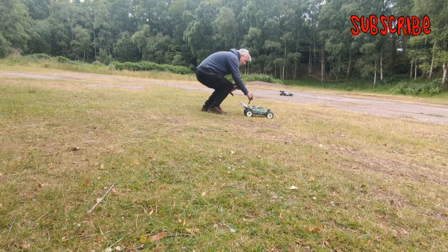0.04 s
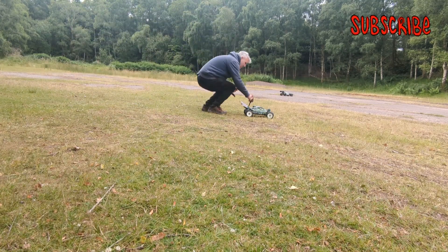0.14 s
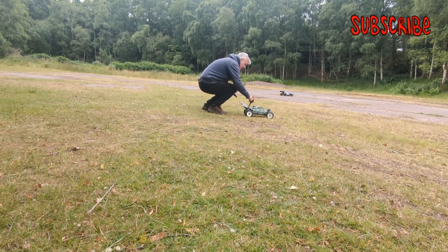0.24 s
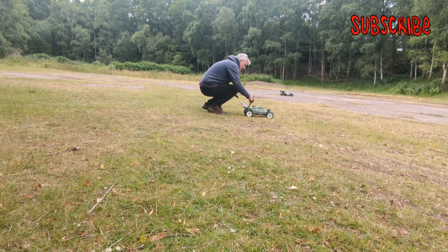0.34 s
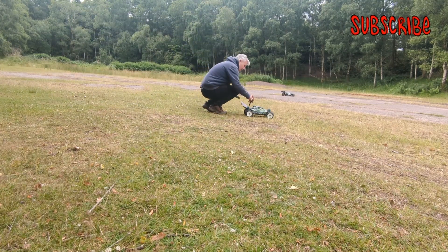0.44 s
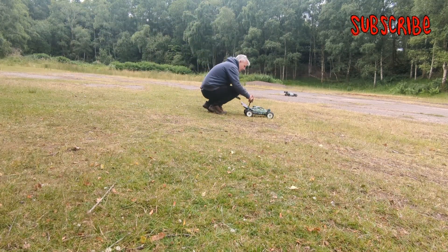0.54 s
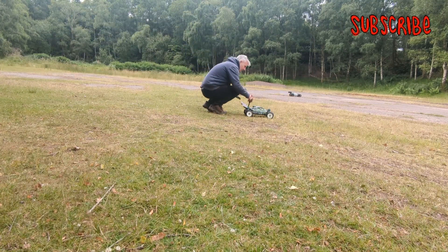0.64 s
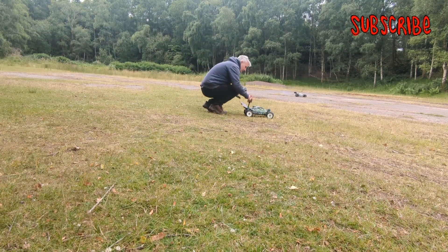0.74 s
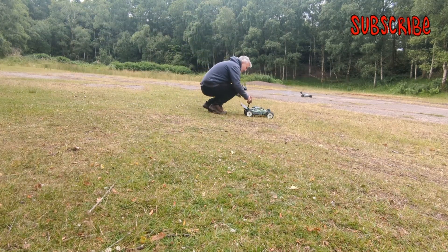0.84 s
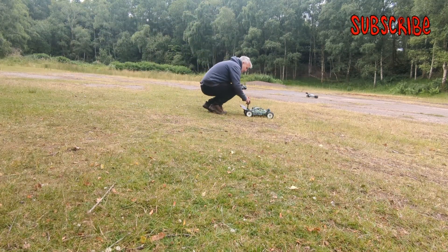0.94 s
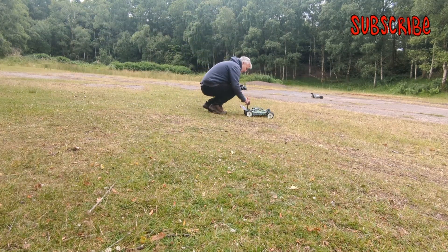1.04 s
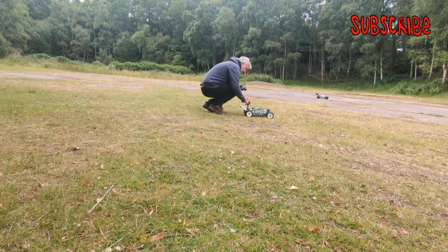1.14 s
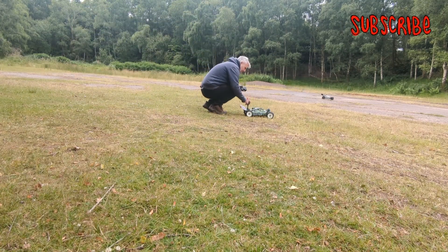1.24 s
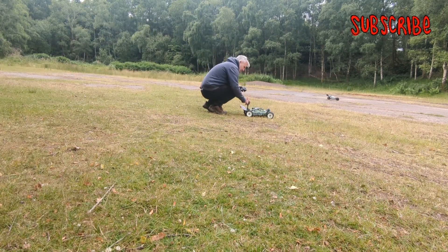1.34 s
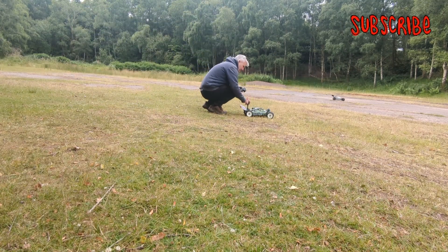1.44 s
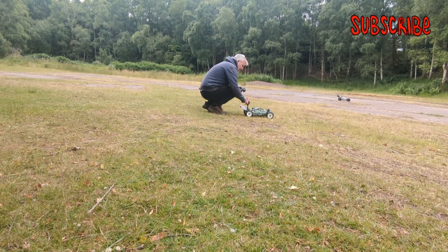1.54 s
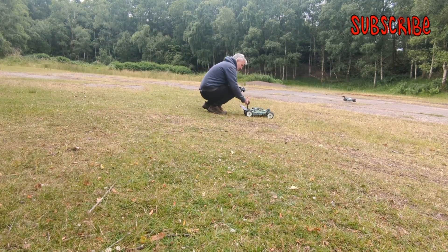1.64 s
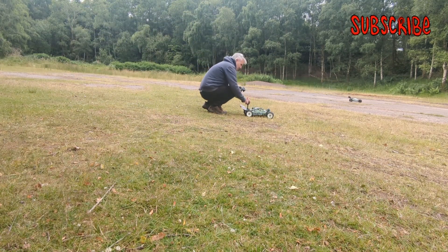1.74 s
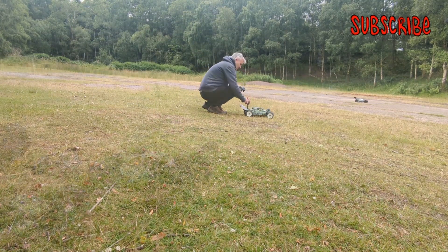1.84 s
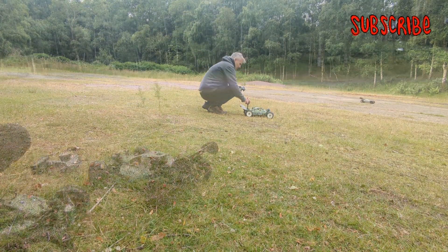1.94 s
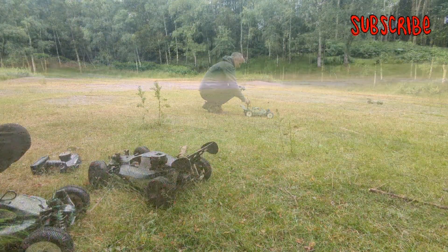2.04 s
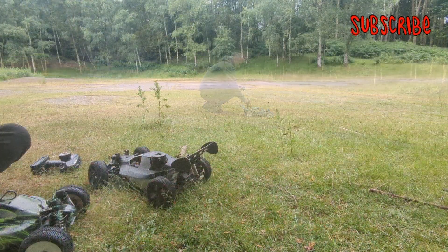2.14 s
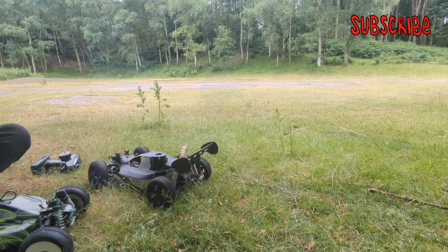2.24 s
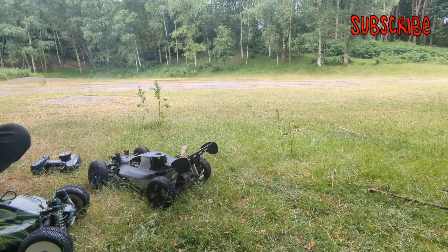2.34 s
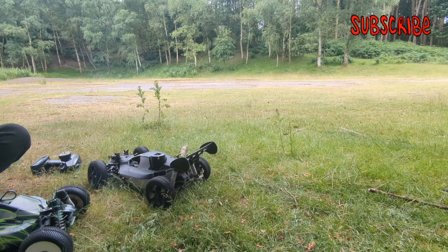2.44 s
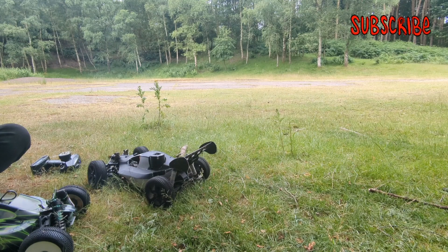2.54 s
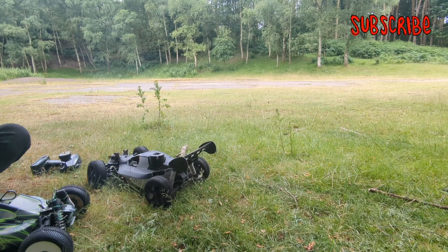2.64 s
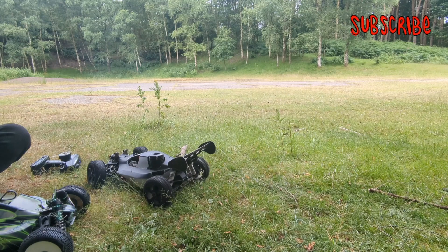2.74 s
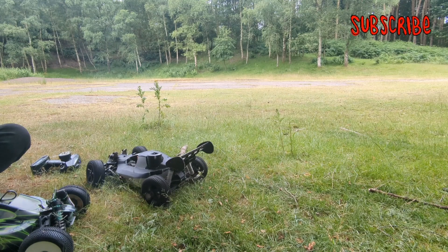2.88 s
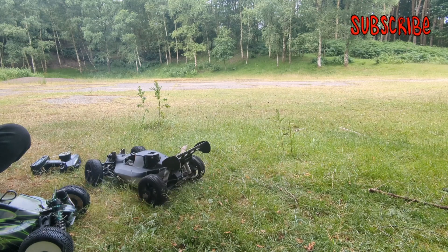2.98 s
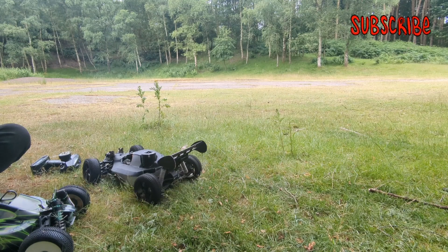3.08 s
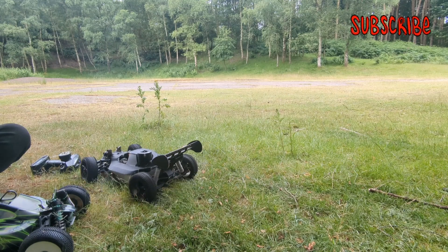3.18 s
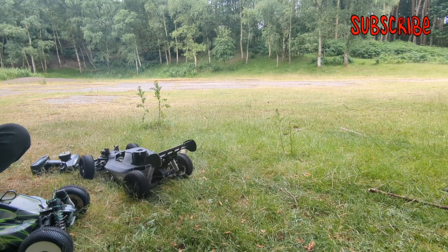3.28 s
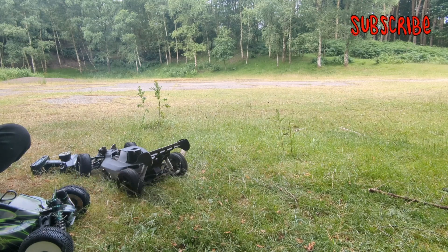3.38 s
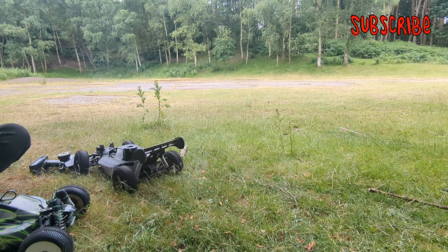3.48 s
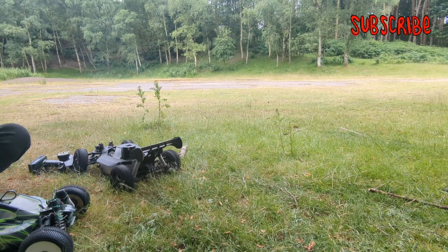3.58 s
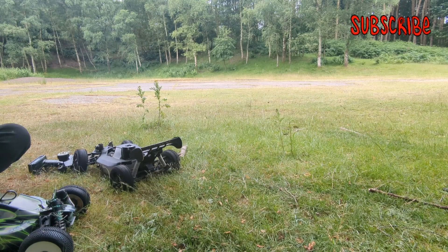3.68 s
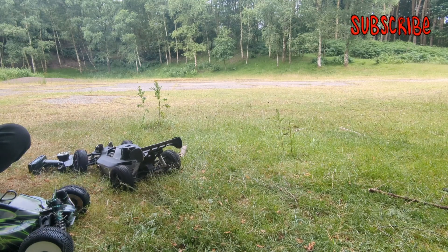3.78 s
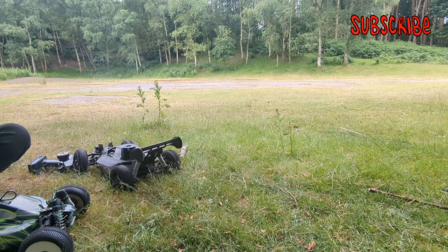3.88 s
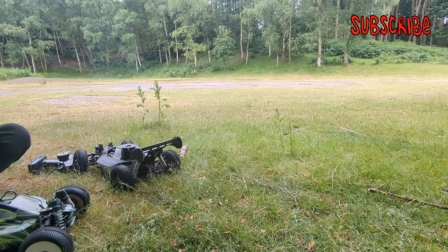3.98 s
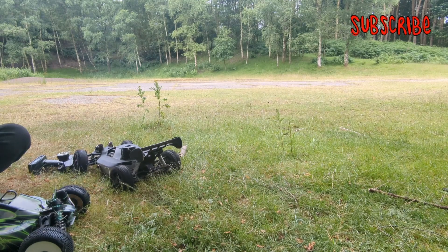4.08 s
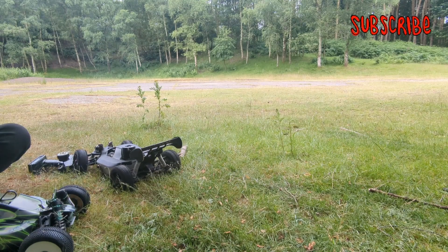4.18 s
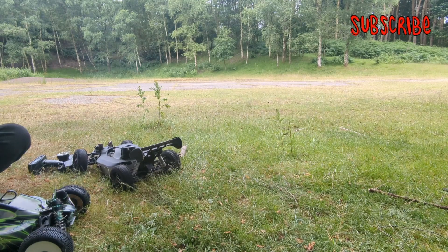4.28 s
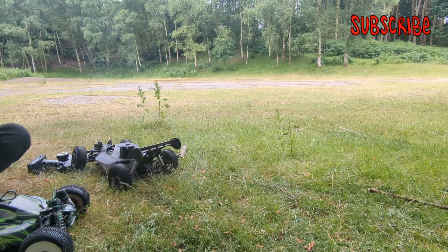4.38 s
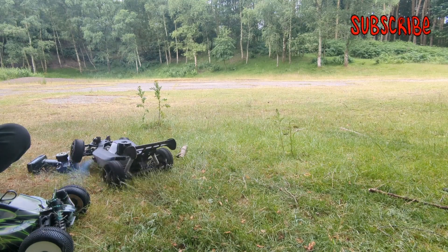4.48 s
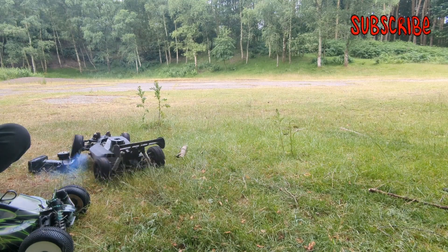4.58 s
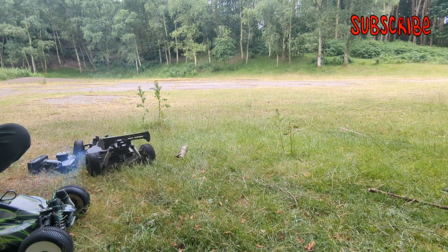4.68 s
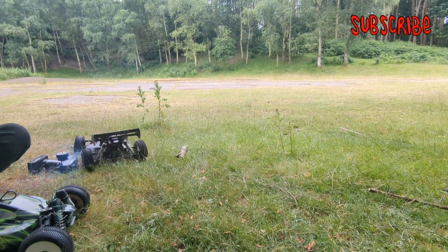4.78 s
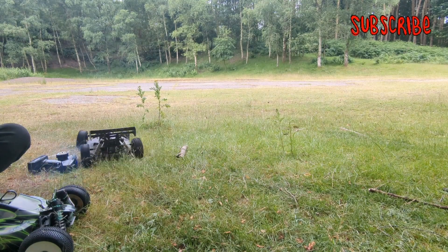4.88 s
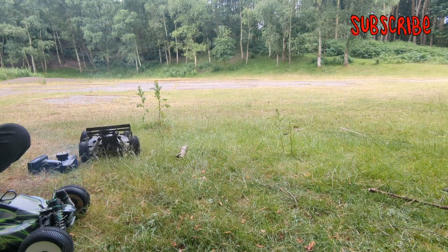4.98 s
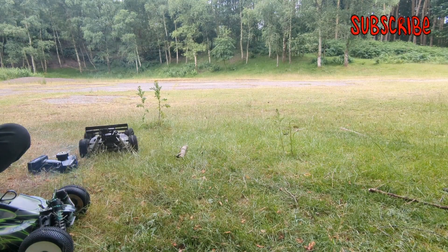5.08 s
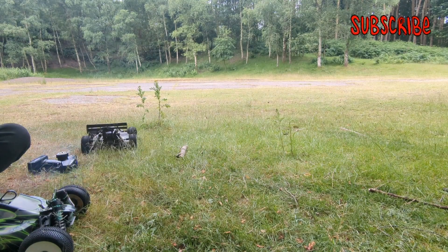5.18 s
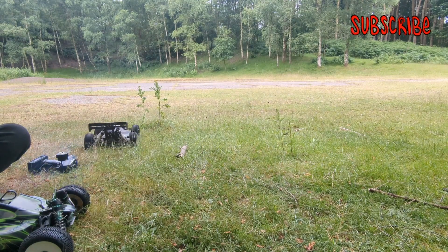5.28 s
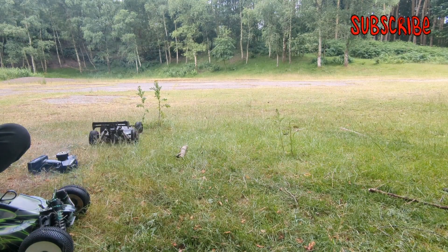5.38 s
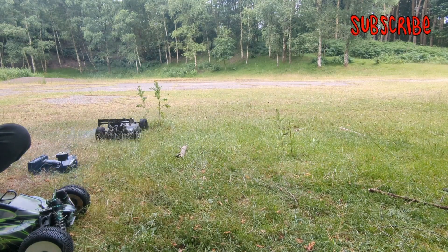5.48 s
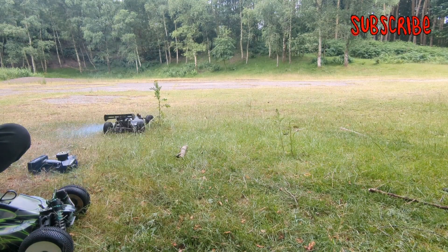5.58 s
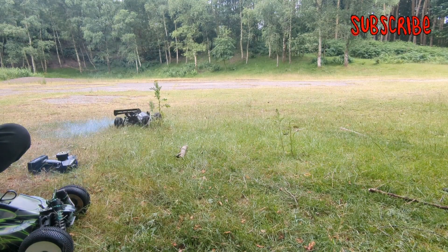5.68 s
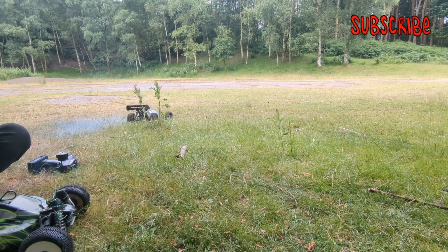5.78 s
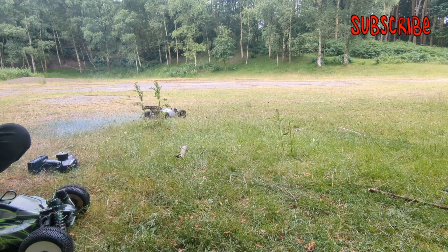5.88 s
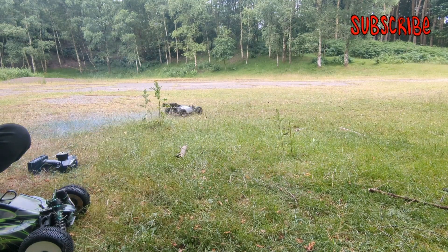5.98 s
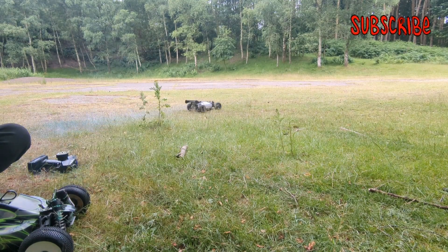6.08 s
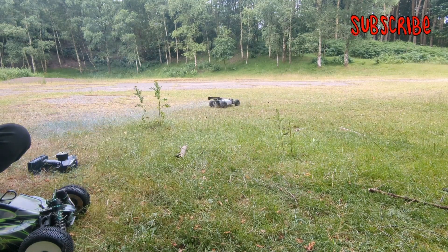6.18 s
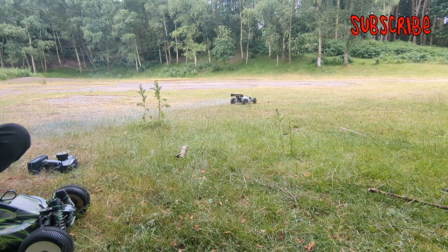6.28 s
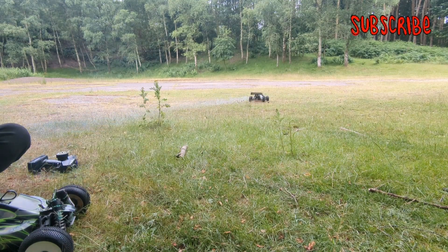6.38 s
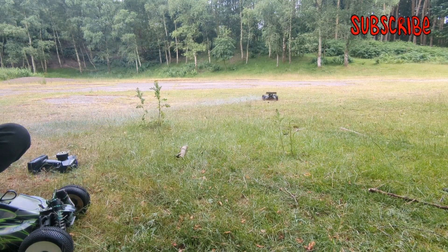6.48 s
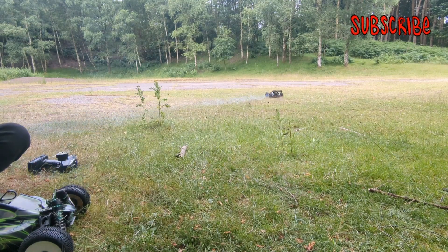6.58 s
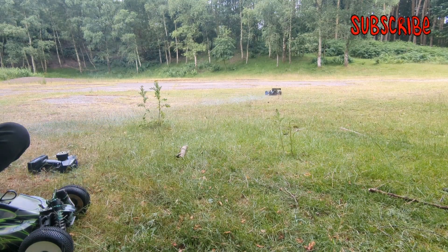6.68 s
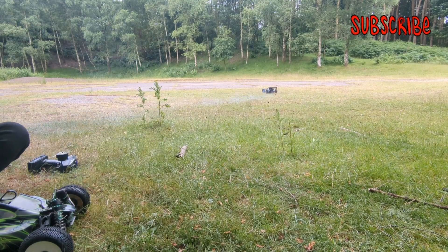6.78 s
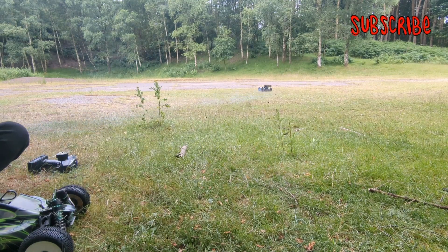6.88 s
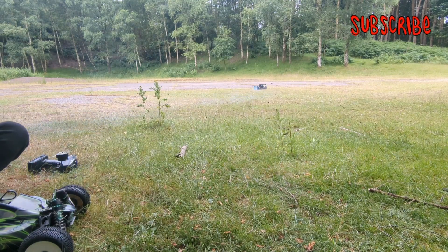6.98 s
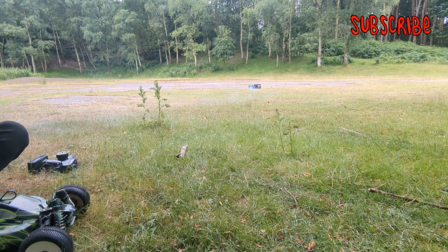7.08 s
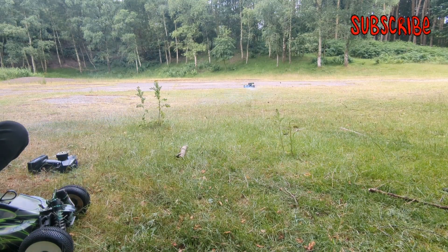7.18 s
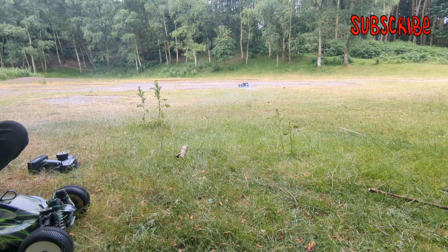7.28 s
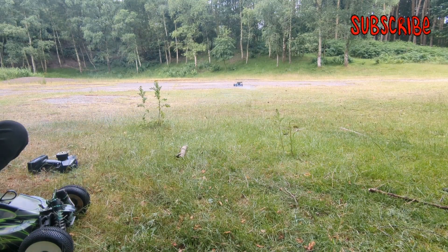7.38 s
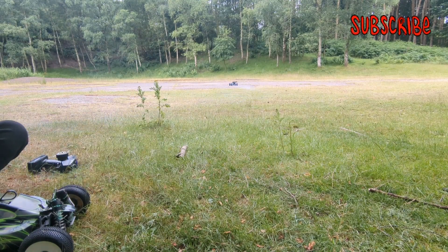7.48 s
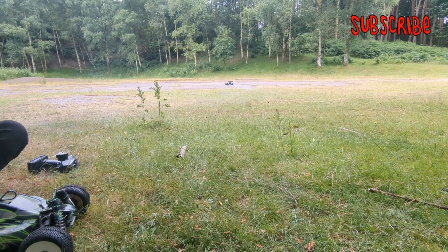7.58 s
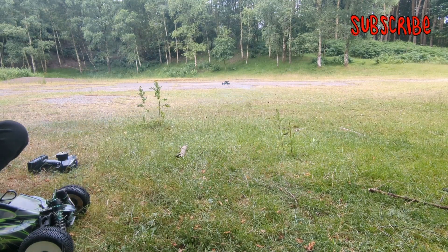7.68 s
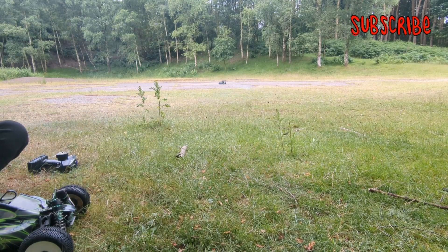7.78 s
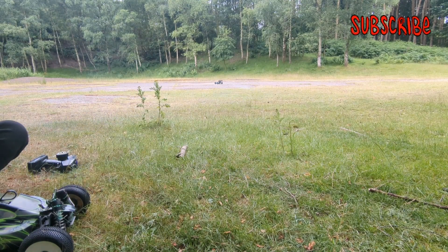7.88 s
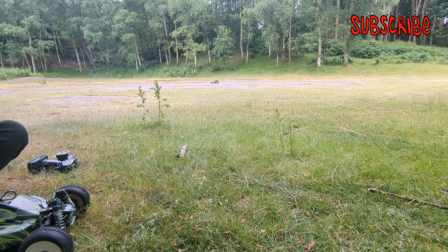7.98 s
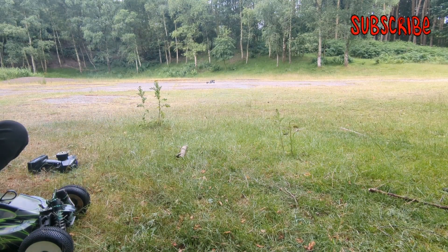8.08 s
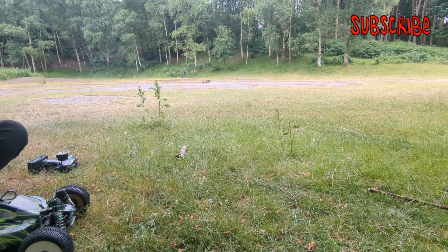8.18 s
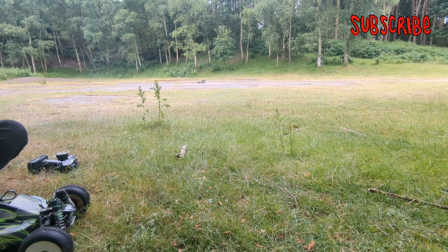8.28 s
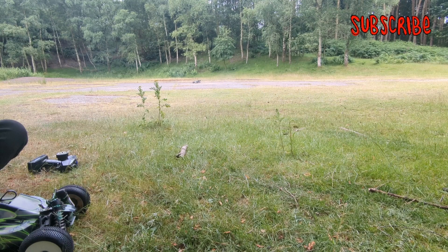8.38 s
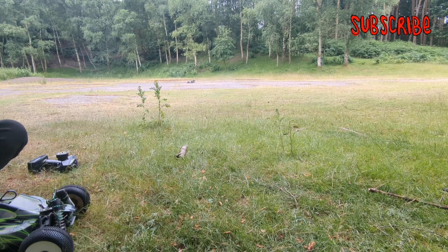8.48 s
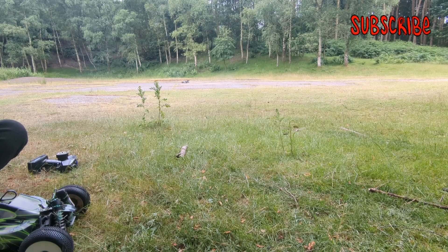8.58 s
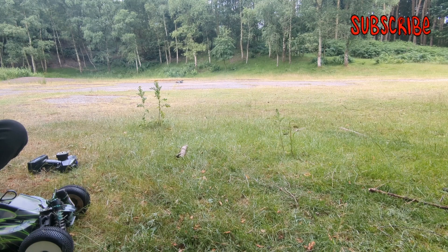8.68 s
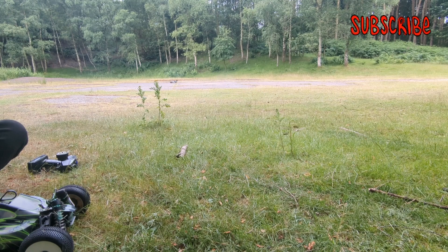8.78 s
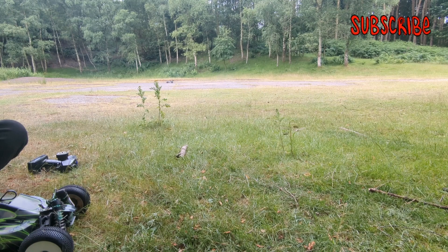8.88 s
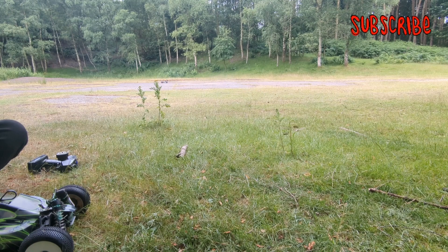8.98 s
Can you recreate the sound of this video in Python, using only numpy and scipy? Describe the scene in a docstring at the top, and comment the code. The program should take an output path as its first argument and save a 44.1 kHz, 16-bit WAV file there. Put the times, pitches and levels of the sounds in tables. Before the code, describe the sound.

Outdoors on a field by a wood, a distant model buggy engine stutters and revs briefly. Another small two-stroke takes over close to the microphone on the left, sputtering at first, then running steadily with a bright, ringing rasp. It revs up and down as it pulls away, growing fainter and dropping back to a burble. Soft wind rumble and a faint hush lie underneath, with a single hard tap just before the end.

```python
"""A small two-stroke model buggy burbles and revs some way off, on a field by a wood. As it fades, a second
sputters in close to the microphone on the left, runs steadily, then drives off blipping its throttle.
Each firing sounds the tuned exhaust pipe and rings the crankcase and fins; at part throttle the engines
fire in short runs with misfires between. The trees return a faint echo, light wind rumbles on the
microphone, and there is one close knock near the end."""
import sys
import numpy as np
from scipy import signal
from scipy.fft import rfft, irfft, next_fast_len
from scipy.io import wavfile
from scipy.ndimage import uniform_filter1d, map_coordinates

SR = 44100
rng = np.random.default_rng(int(sys.argv[2]) if len(sys.argv) > 2 else 0)


def int16_out(signal):
    """Quantize to a 16-bit WAV file."""
    q = np.round(np.clip(np.atleast_2d(signal).T, -1, 1) * 32767)
    wavfile.write(sys.argv[1], SR, q.astype(np.int16))


N = 398223


def gain_of(db):
    return 10 ** (np.asarray(db) / 20)


def unit_rms(x):
    return x / np.sqrt(np.mean(x ** 2) + 1e-20)


def level_at(spectrum, hz):
    freqs, db = np.transpose(spectrum)
    return np.interp(np.log(hz + 1), np.log(freqs + 1), db)


def curves(rows):
    """One curve for each column after the time."""
    times, *columns = np.transpose(rows)
    return [np.interp(np.arange(N) / SR, times, column) for column in columns]


def impulses(events, height):
    out = np.zeros(N)
    for at_s, value in events:
        out[round(at_s * SR)] = height(value)
    return out


def drift(seconds):
    """Smooth random wander of rms 1."""
    span = max(round(seconds * SR), 1)
    return unit_rms(uniform_filter1d(uniform_filter1d(rng.standard_normal(N), span), span))


def stereo_noise(spectrum):
    size = next_fast_len(N)
    shape = gain_of(level_at(spectrum, np.fft.rfftfreq(size, 1 / SR)))
    return unit_rms(irfft(rfft(rng.standard_normal((2, size))) * shape, size)[:, :N])


def ring(x, modes, widen=0.85, drift_db=0.):
    """Steep resonances, alternating in sign; each level may drift."""
    out = 0
    for k, (hz, width, db) in enumerate(modes):
        pole = np.exp((2j * np.pi * hz - np.pi * width * widen) / SR)
        once = signal.lfilter([1 - abs(pole)], [1, -pole], x)
        twice = signal.lfilter([1 - abs(pole)], [1, -pole], once).real
        out = out + (-1) ** k * gain_of(db + np.roll(drift_db, k * SR)) * twice
    return unit_rms(out)


def gliding_ring(x, hz, width):
    """A steep resonance that follows the curve hz: shift down, smooth twice, shift back."""
    carrier = np.exp(2j * np.pi * np.cumsum(hz) / SR)
    r = np.exp(-np.pi * width / SR)
    return unit_rms((carrier * signal.lfilter([(1 - r) ** 2], [1, -2 * r, r * r], x / carrier)).real)


def field_hush():
    """Distant air and leaves, steady all round."""
    # (frequency [Hz], density [dB])
    spectrum = [(100, -23), (200, -10.5), (400, -10), (1000, -17.5), (2300, -22.5), (5000, -51),
                (9000, -28), (16000, -55)]
    return gain_of(-56) * stereo_noise(spectrum)


def wind():
    """Lumpy rumble, with a few puffs on the microphone ports."""
    # rumble (frequency [Hz], density [dB])
    spectrum = [(30, -54), (60, -1.5), (100, -7), (170, -9), (240, -17), (400, -70)]
    # gusts and single puffs (time [s], level [dB])
    gusts = [(0.0, -69), (0.98, -72), (1.63, -57.5), (2.4, -72), (5.28, -66), (8.73, -85), (9.03, -71)]
    puff_hits = [(0.329, -57), (5.448, -49), (7.919, -59)]
    puffs = signal.oaconvolve(impulses(puff_hits, gain_of), np.hanning(round(0.078 * SR)), "same")
    lumps = gain_of(curves(gusts)[0] + 12 * np.tanh(0.45 * drift(0.069) + .5 * drift(0.035)))
    return stereo_noise(spectrum) * (lumps + 2.2 * puffs) * gain_of([[-1.5], [1.5]])


def wood_echo(x, t60=0.86, first_s=0.016):
    """Scattered returns from ground and trees: sparse taps of random sign, dying away."""
    count = SR // 40
    at = 20 * np.arange(count) + rng.integers(0, 20, (2, count))
    returns = rng.choice([-1., 1.], at.shape) * gain_of(-60 * at / SR / t60) * (at > first_s * SR)
    taps = np.zeros((2, SR // 2))
    np.put_along_axis(taps, at, returns, 1)
    return signal.oaconvolve(x, taps / np.linalg.norm(taps[0]), axes=1)[:, :N]


def knock():
    """Something hard is tapped close by, earlier and louder on the left."""
    # contacts (time [s], level [dB])
    contacts = [(8.8273, -35), (8.8474, -32), (8.8583, -26)]
    # its ring (frequency [Hz], level [dB], t60 [s])
    modes = [(699, 4, 0.02), (2060, -1, 0.044), (2690, -12, 0.047), (3740, -1, 0.019)]
    t = np.arange(3000) / SR
    tap = sum(gain_of(db - 60 * t / t60) * np.sin(2 * np.pi * hz * t) for hz, db, t60 in modes)
    x = signal.oaconvolve(impulses(contacts, gain_of), tap * np.minimum(t / 0.00068, 1))[:N]
    return np.array([gain_of(2.5) * np.roll(x, -18), x])


def burble(spells, run_s, full_depth_db=8):
    """Runs of firing between misfires: their swell in dB, and how far the engine is burbling, 0-1."""
    runs, burbling = [], np.zeros(N)
    for first, last, gap, depth_db in spells:
        at = np.linspace(first, last, round((last - first) / gap) + 1)
        slip, vary = rng.standard_normal((40, 2))[:len(at)].T
        runs += zip(at + .0012 * slip, depth_db * (1 + .08 * vary))
        span = slice(max(round((first - gap) * SR), 0), round((last + gap) * SR))
        burbling[span] = min(depth_db / full_depth_db, 1) ** 2
    run_shape = signal.windows.tukey(round(run_s * SR), .7)
    burn_db = signal.oaconvolve(impulses(runs, float), run_shape, "same")
    burn_db -= uniform_filter1d(burn_db, round(0.0506 * SR))
    return burn_db, uniform_filter1d(burbling, round(.07 * SR))


def exhaust_levels(exhaust, on_song, hz):
    """Levels in dB of orders 1-3 and the rasp: the pipe comes on song with speed."""
    # part of the overtone lift (second order [share], third order [share], rasp [share])
    lift_shares = (1, 1.76, 0.31)
    first_db, lift_db = curves(exhaust)
    song_hz, *song_db = np.transpose(on_song)
    return [first_db] + [first_db + np.interp(hz, song_hz, db) + share * lift_db
                         for db, share in zip(song_db, lift_shares)]


def pipe_rasp(hz, turns, slope_db, noisy, uneven):
    """Orders 4-13 shaped by the tuned pipe, plus the turbulence inside it."""
    # pipe response (frequency [Hz], level [dB])
    pipe = [(800, 24.5), (1100, 10.5), (1300, 12.5), (1600, 16), (2000, 11.5), (2300, 19), (2800, 4),
            (3600, 6.5)]
    orders = np.arange(4, 14)[:, None]
    gains = gain_of(level_at(pipe, orders * hz) + slope_db * np.log2(np.minimum(orders, 8)))
    # moving air and ground make each order swell and sink on its own
    waver = drift(.045)[(np.arange(N) + orders * SR // 2) % N]
    gains *= gain_of((1 + .75 * orders * noisy) * waver)
    harmonics = (gains * np.cos(2 * np.pi * orders * turns - 0.2914 * orders ** 2)).sum(0)
    turbulence = ring(rng.standard_normal(N), [(500, 600, 0), (1700, 1500, 0)])
    return harmonics / np.linalg.norm(gains, axis=0) + (.06 + 2.4 * uneven) * turbulence


def firing_blows(hz, turns, uneven, rattle_s=.004):
    """One blow a turn, and the chatter of thin parts after it, the same way every turn."""
    age = (turns % 1) * SR / hz  # samples since the firing
    force = gain_of((1.1 + 9 * uneven) * rng.uniform(-1, 1, N)[turns.astype(int)])
    blow = unit_rms(np.sinc(.8 * (age - 6)) * (age < 12) * force)
    chatter = rng.standard_normal(round(rattle_s * SR))
    chatter *= np.linspace(1, 0, len(chatter))
    return blow, unit_rms(signal.oaconvolve(blow, chatter)[:N])


def engine_body(body, blow, rattle, rush, noisy, swell_db, shake_db, side):
    """Crankcase, cooling fins and intake, rung by the firings and by rushing air."""
    # resonances (frequency [Hz], width [Hz], level [dB])
    case = [(2677, 540, 5), (3366, 236, 4), (3984, 410, 8), (4616, 610, 6), (5317, 480, 5)]
    fins = [(5900, 1400, -11), (6860, 710, -5.5), (7470, 820, -7), (8520, 1110, -14)]
    intake = [(10100, 1120, -7.5), (11540, 690, -2.5), (13700, 2600, -6)]
    case_db, hiss_db = curves(body)
    fin_db = case_db + 4 + 0.61 * np.minimum(hiss_db, -4)
    parts = [(case, blow, noisy, case_db + .3 * swell_db),
             (fins, rattle, noisy ** .85, fin_db + 3.5 * side + .55 * swell_db),
             (intake, rattle, noisy ** .6, case_db + hiss_db + .5 * side + .55 * swell_db)]
    out = 0
    for modes, drive, noise_share, db in parts:
        struck = np.sqrt(1 - noise_share) * ring(drive, modes, 1, shake_db)
        blown = np.sqrt(noise_share) * ring(rush, modes, 1.8, shake_db)
        out += gain_of(db) * (struck + blown)
    return out


def narrow_rings(rings, blow, rush, haze, swell_db):
    """Rings that come and go as the buggy turns, silent outside their spans."""
    t = np.arange(N) / SR
    out = 0
    for table, steady_hz, width, swell, noise in rings:
        db, *glide = curves(table)
        hz = glide[0] if glide else np.full(N, steady_hz)
        level = gain_of(db + swell * swell_db) * (t > table[0][0]) * (t < table[-1][0])
        out += level * gliding_ring(blow + (noise + haze) * rush, hz, width)
    return out


def engine(speed, exhaust, on_song, body, distance_haze, path, spells, rings, run_s, sputter=0):
    """A two-stroke at the stereo microphone: one firing a turn drives the pipe and rings the metal."""
    (hz,), (lag, slope_db), (haze,) = curves(speed), curves(path), curves(distance_haze)
    hz = uniform_filter1d(hz, round(.03 * SR))  # flywheel
    burn_db, burbling = burble(spells, run_s)
    noisy = np.maximum(np.maximum(haze, .38 * burbling), sputter)
    uneven = np.maximum(.01 + .1 * haze + .07 * burbling, sputter)
    *order_db, rasp_db = exhaust_levels(exhaust, on_song, hz)

    push = np.cumsum(burn_db) / SR  # the crank gains speed through each run and coasts after it
    hz = hz + 285 * (push - uniform_filter1d(push, round(.06 * SR)))
    bumps = (.0025 + .006 * haze ** 2) * drift(.04)  # rough ground
    blur = .03 * haze ** 3 * drift(.008)  # moving air
    turns = np.cumsum(hz * (1 + bumps + blur + .08 * uneven * drift(.004))) / SR
    strength = gain_of(uniform_filter1d(13 * uneven * rng.uniform(-1, 1, N)[turns.astype(int)], 60))

    pipe = sum(gain_of(order_db[k] + swell * burn_db) * np.cos(2 * np.pi * (k + 1) * turns + 1.2 * k)
               for k, swell in enumerate((.45, .95, .9)))
    pipe += gain_of(rasp_db + 0.47 * burn_db) * pipe_rasp(hz, turns, slope_db, noisy, uneven)

    blow, rattle = firing_blows(hz, turns, uneven)
    port_pulse = .5 + np.exp(-(turns % 1) / 20)  # the ports faintly pulse the hiss
    swell_db = np.roll(burn_db, round(0.0023 * SR))  # the metal rings on a little behind the exhaust
    shake_db = 1.3 * drift(.1)  # the shaking chassis turns each part to and from the microphone
    sway = gain_of(1.6 * np.sqrt(haze) * drift(0.014))  # the level wavers more far off
    shared_noise = rng.standard_normal(N)
    channels = []
    for side in (.5, -.5):  # left, right
        rush = unit_rms(port_pulse * (0.5 * shared_noise + rng.standard_normal(N)))
        metal = engine_body(body, blow, rattle, rush, noisy, swell_db, shake_db, side)
        metal += narrow_rings(rings, blow, rush, haze, swell_db)
        sound = sway * (np.sqrt(2) * strength * pipe + metal)
        channels.append(map_coordinates(sound, [np.arange(N) - side * lag], order=3))
    return np.array(channels)


def far_buggy():
    """Some way off to the right, an engine burbles, revs twice and fades."""
    # engine tables, with the same columns as in near_buggy
    speed = [(0, 254), (.32, 247.3), (.436, 335.6), (.65, 338.4), (.794, 299), (.86, 247), (.93, 232.5),
             (1, 243.9), (1.64, 262), (1.9, 263.8), (2.03, 342.4), (2.18, 319.6)]
    exhaust = [(0, -55, -2.5), (.32, -54.5, -0.5), (.36, -50, -1.5), (.55, -45, 2.5), (.9, -55.5, -4),
               (1.6, -48, -1), (1.9, -48.5, -6.5), (2.03, -47, 4), (2.18, -47, -7), (2.5, -53, 0)]
    on_song = [(236, -1.5, 6.4, 0.45), (284, 1.5, 3.9, -0.78), (360, 9.5, 0.81, 1.6)]
    body = [(0, -54.5, -11), (.32, -53.5, -14), (.4, -46, -9.5), (.72, -42.5, -13.5), (.9, -56, -15),
            (1.36, -55.5, -13), (2.0, -38, -11), (2.5, -60, -8)]
    haze = [(1.4, .2), (1.5, .6)]
    path = [(0, 2.86, -4.5), (1.4, 6.44, -5)]
    spells = [(.052, .161, .0545, 12), (.279, .339, .06, 12), (.859, .976, .058, 9.5),
              (1.041, 1.136, .048, 11.5), (1.196, 1.727, .059, 11.5)]
    # narrow ring (time [s], level [dB])
    whine = [(.33, -59), (.41, -38), (.6, -69), (1.55, -60), (1.65, -56), (1.85, -60)]
    rings = [(whine, 5200, 350, .3, .3)]
    fade = np.clip((exhaust[-1][0] - np.arange(N) / SR) / .2, 0, 1)
    return engine(speed, exhaust, on_song, body, haze, path, spells, rings, run_s=.031) * fade


def near_buggy(settles_s=1.87):
    """Close on the left, an engine sputters, settles, then drives off blipping its throttle."""
    # crank speed (time [s], firing rate [Hz])
    speed = [(1.4, 199.6), (1.75, 211), (1.86, 234.6), (2.33, 237.4), (2.44, 243.3), (2.84, 242.5),
             (2.9, 257.5), (4.186, 249.3), (4.314, 270.7), (4.37, 293.6), (4.522, 298.6), (4.72, 261.7),
             (4.79, 220.9), (5.0, 233.8), (5.2, 235.6), (5.25, 268.3), (5.45, 301.4), (5.85, 325.3),
             (6.1, 303.4), (6.45, 313.7), (6.54, 336), (6.77, 221.4), (6.85, 292.2), (7.05, 321.4),
             (7.11, 354.7), (7.18, 308), (7.26, 344.7), (7.42, 276.3), (7.5, 235.2), (7.57, 250.7),
             (7.77, 228.6), (7.84, 230.2), (7.9, 212), (8.27, 221.3), (8.4, 270.1), (8.54, 285.2),
             (8.62, 252.8), (8.68, 219.5), (8.8, 234.2), (9.03, 228.7)]
    # exhaust (time [s], first order [dB], overtone lift toward the microphone [dB])
    exhaust = [(1.34, -84, -6), (1.39, -53, -9), (1.47, -52, 0.5), (1.75, -51, -2.5), (1.86, -45.5, -2.5),
               (2.35, -35.5, -4.5), (3.22, -34.5, -4), (4.11, -36, -5), (4.55, -39, -4), (4.78, -34, -6),
               (5.18, -38, -4), (5.3, -33.5, -7.5), (5.666, -33, -3), (5.69, -31, 1), (6.42, -38.5, 1.5),
               (6.5, -45, -2), (6.66, -45, 1.5), (6.75, -48.5, -0.5), (6.83, -40.5, 1), (7.39, -43, -0.5),
               (7.45, -48.5, -6.5), (8.2, -45, -5), (8.55, -46, -3), (8.71, -50, -7.5), (9.03, -49, -4)]
    # overtones above the first order (firing rate [Hz], second [dB], third [dB], rasp [dB])
    on_song = [(218, -1, 4, -2), (266.4, -2, 2, 5), (279.4, 6.5, 5.5, 4), (309.4, 10, -1.5, 4.5)]
    # bare engine (time [s], case ring [dB], hiss relative to it [dB])
    body = [(1.35, -82, -23), (1.5, -56.5, -5.5), (2.2, -34, -5.5), (2.85, -29.5, -6.5),
            (2.908, -27.5, -7.5), (3.3, -25.5, -10), (4.55, -33, -2), (4.66, -28, -5), (4.76, -35.5, -5.5),
            (5.04, -36.5, -6.5), (5.5, -28.5, -10), (5.75, -23.5, -6), (5.98, -32, -4.5), (6.08, -39, -6),
            (6.27, -25, -12.5), (6.79, -53, 2), (6.85, -45, 8), (7.36, -37, -7), (7.48, -43.5, -17.5),
            (8.05, -45.5, -16.5), (8.25, -55, -13.5), (8.57, -43, -17), (8.671, -56.5, -18),
            (9.03, -56.5, -16)]
    # noise in the ring when running clean, rising with distance (time [s], share [0-1])
    haze = [(4.5, .045), (4.66, .25), (4.75, .09), (5.62, .2), (5.72, .5), (7.4, .55), (7.55, .38),
            (8.4, .36)]
    # bearing and heading (time [s], lag of the left channel [samples], rasp slope [dB/octave])
    path = [(1.4, -8.5, 0.5), (4.1, -8.5, -3), (4.9, -11, 11.5), (5.799, -7.5, -10.5), (6.05, -4, -13.5),
            (6.4, 2.5, -14), (6.9, 6, 12), (7.5, -0.5, 3.5), (8.3, -2, 1), (9, -5, -2)]
    # burbling spells (first run [s], last run [s], spacing [s], depth [dB])
    spells = [(1.505, 1.648, .0477, 6), (1.694, 2.153, .0417, 8), (2.203, 2.372, .042, 8),
              (2.408, 2.483, .037, 8), (2.515, 2.862, .0386, 8.5), (3.242, 4.164, .0256, 1.9),
              (4.729, 4.777, .048, 5.5), (4.833, 4.957, .062, 9.5), (5.007, 5.051, .044, 10),
              (5.089, 5.205, .038, 10), (7.764, 7.851, .029, 3), (8.04, 8.125, .042, 4.5),
              (8.249, 8.352, .052, 6.5), (8.757, 9.008, .05, 8.5)]
    # gliding rings (time [s], level [dB], frequency [Hz])
    ping = [(1.5, -67, 4740), (1.75, -45, 4734), (2.2, -34.5, 4740), (2.87, -30.5, 4750),
            (2.895, -22, 4650), (3.15, -22.5, 4620), (3.5, -31.5, 4294), (4.1, -27, 4560),
            (4.22, -23.5, 4650), (4.4, -51, 4860)]
    whine = [(4.2, -41, 4630), (4.35, -31.5, 4830), (4.5, -41, 5020), (4.65, -26.5, 4740), (4.8, -38, 4960),
             (5.25, -36, 4950), (5.45, -25.5, 4940), (5.75, -27, 4990), (5.95, -40, 4892),
             (6.25, -31, 4917), (6.6, -44, 4720), (7.45, -41, 4640), (8.25, -56, 4410)]
    growl = [(3.2, -43, 2780), (3.6, -38.5, 2760), (4.2, -34, 2740), (4.45, -32, 2390), (4.9, -46, 2700)]
    # rings of steady pitch (time [s], level [dB])
    bark = [(4.6, -86), (4.8, -46), (5.2, -41), (5.5, -28), (5.75, -41)]
    chime = [(1.8, -58), (2.3, -40.5), (3.15, -38), (3.4, -60)]
    shrill = [(3.68, -50), (3.73, -27.5), (4.45, -25), (4.75, -36), (5.2, -38), (5.35, -56.5)]
    piercing = [(2.9, -50), (3.3, -32), (3.72, -20), (4.2, -23.5), (4.35, -30), (5.35, -55)]
    sizzle = [(4.2, -65), (4.6, -47.5), (5.3, -43.5), (5.75, -29), (6.3, -46.5), (6.7, -43), (7.5, -75)]
    pipe_note = [(7.55, -79), (7.75, -52), (8.15, -52), (8.3, -83)]
    # (table, steady pitch [Hz], width [Hz], swell in a run [share], noise beside the blows [gain])
    rings = [(ping, None, 400, .95, .1), (whine, None, 300, .15, .2), (growl, None, 150, .2, .05),
             (bark, 3870, 200, .2, .35), (chime, 6550, 400, .7, .4), (shrill, 7020, 300, 1.15, .15),
             (piercing, 7570, 400, .9, .15), (sizzle, 8900, 420, .6, 1.2),
             (pipe_note, 1550, 160, .3, .05)]
    t = np.arange(N) / SR
    sputter = .75 * np.clip((settles_s - t) / .15 + .5, 0, 1)
    sound = engine(speed, exhaust, on_song, body, haze, path, spells, rings, run_s=.023, sputter=sputter)
    return sound * (t > exhaust[0][0])


def scene():
    buggies = far_buggy() + near_buggy()
    return buggies + gain_of(-15) * wood_echo(buggies) + wind() + field_hush() + knock()


def record(dry, cutoff_hz=15900):
    """The microphone's band ends steeply in the high treble."""
    lowpass = signal.firwin(511, cutoff_hz, window=("kaiser", 9), fs=SR)
    return signal.oaconvolve(dry, lowpass[None], "same")


dry = scene()
out = record(dry)
int16_out(out)
```